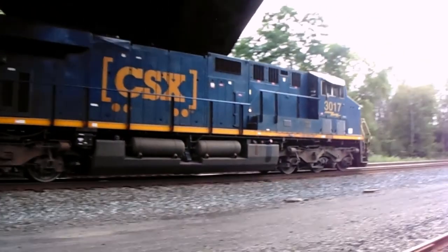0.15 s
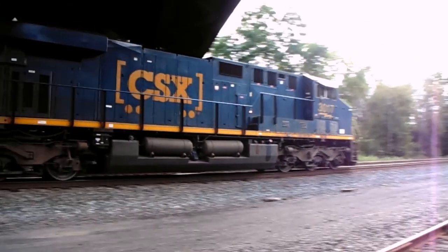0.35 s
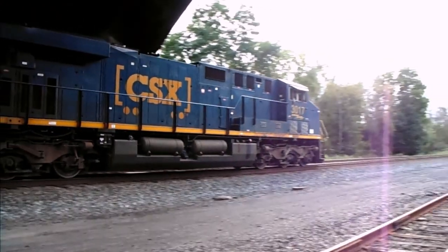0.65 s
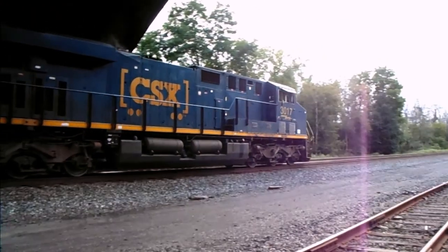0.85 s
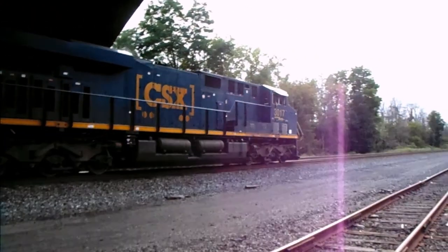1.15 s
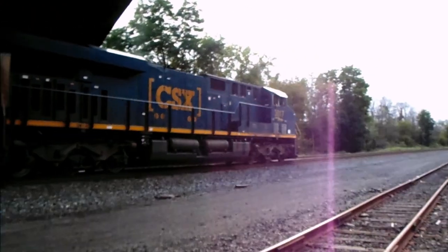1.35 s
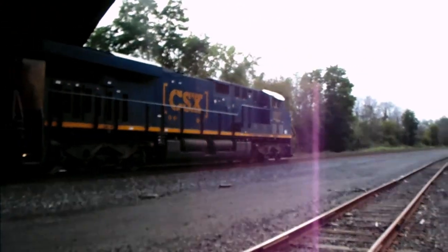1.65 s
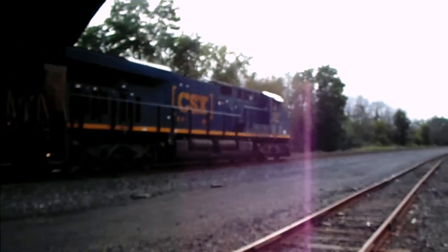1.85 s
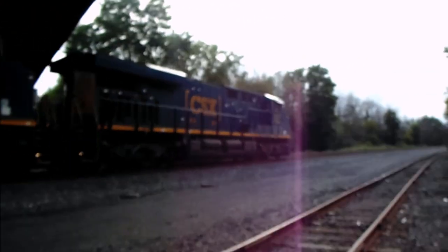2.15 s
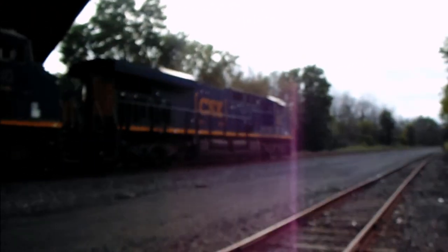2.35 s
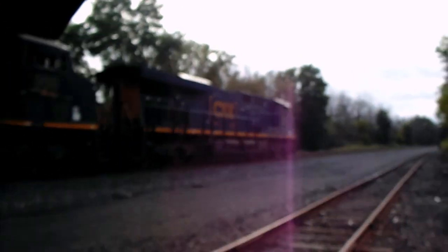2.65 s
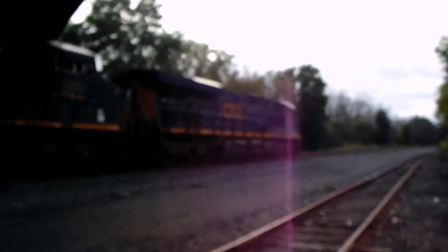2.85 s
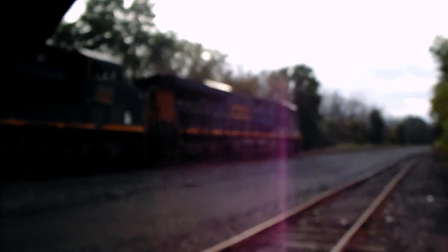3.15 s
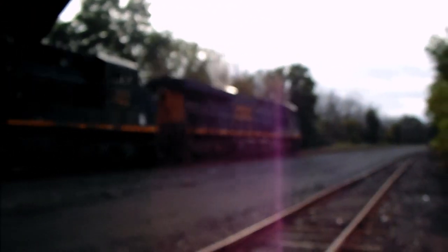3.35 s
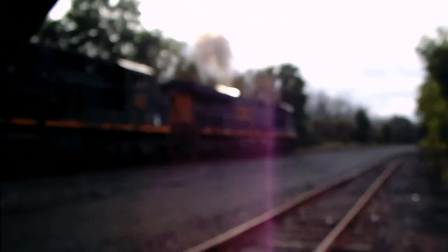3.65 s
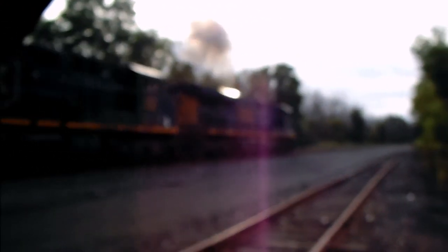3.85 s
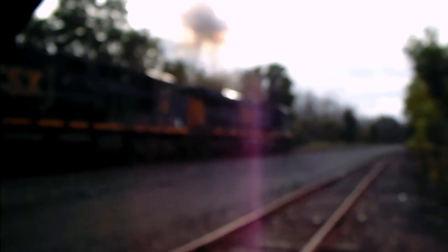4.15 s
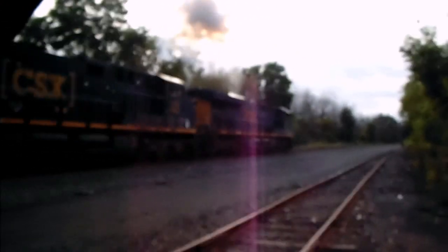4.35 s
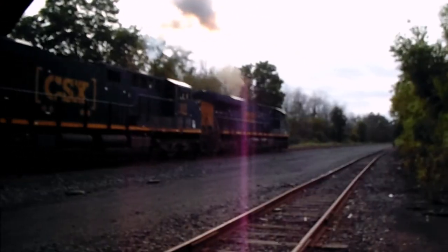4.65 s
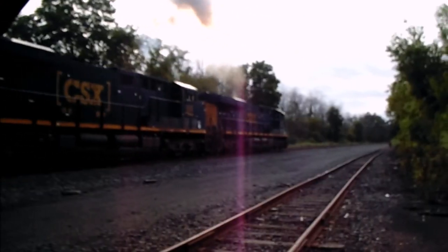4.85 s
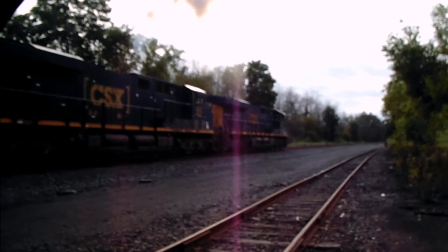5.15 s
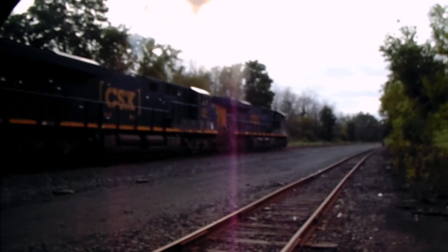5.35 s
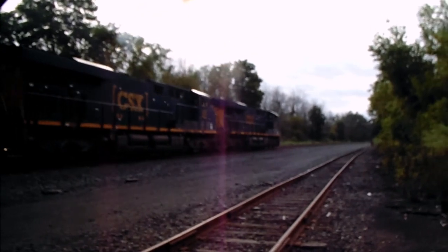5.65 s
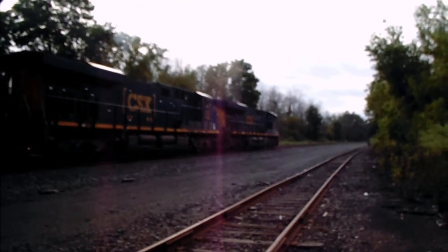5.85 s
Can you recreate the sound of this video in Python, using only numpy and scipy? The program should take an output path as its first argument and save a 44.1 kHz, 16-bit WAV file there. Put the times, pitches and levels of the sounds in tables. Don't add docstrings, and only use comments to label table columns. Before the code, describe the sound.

Two diesel locomotives rumble past close by under power, deep beating drones with a chuffing hiss and roar, then a few sharp wheel knocks on rail joints.

```python
import sys
import numpy as np
from scipy import signal
from scipy.fft import rfft, irfft, next_fast_len
from scipy.io import wavfile
from scipy.ndimage import uniform_filter1d

SR = 44100
rng = np.random.default_rng(int(sys.argv[2]) if len(sys.argv) > 2 else 0)


def boost_factor(decibels):
    exponent = np.asarray(decibels, float) / 20
    return 10 ** exponent


def materialize(psi):
    bounded = np.clip(np.atleast_2d(psi).T, -1, 1)
    quanta = np.round(bounded * 32767).astype(np.int16)
    wavfile.write(sys.argv[1], SR, quanta)


N = 265024
T = np.arange(N) / SR
STEP = 20


def curves(table):
    s, *columns = np.transpose(table)
    return [np.interp(T, s, column) for column in columns]


def humps(rows, t):
    return sum(height * np.exp(-((t - s) / half_s) ** 2) for s, half_s, height in rows)


def walk(rate_hz, step=1):
    hold, count = int(SR / step / rate_hz), -(-N // step)
    levels = np.repeat(rng.standard_normal(count // hold + 1), hold)
    return 1.005 * uniform_filter1d(uniform_filter1d(levels, hold), hold)[:count]


def noise(colour, lo_hz=0, hi_hz=SR):
    hz, db = np.transpose(colour)
    size = next_fast_len(N)
    f = np.maximum(np.arange(size // 2 + 1) * SR / size, 1)
    gain = boost_factor(np.interp(np.log(f), np.log(hz), db, left=-200))
    above_lo = np.clip(np.log2(2 * f / max(lo_hz, 1)), 0, 1)
    above_hi = np.clip(np.log2(2 * f / hi_hz), 0, 1)
    gain = gain * np.sqrt(above_lo - above_hi)
    return irfft(rfft(rng.standard_normal(size)) * gain, size)[:N] * np.sqrt(SR / 2)


def passing(level_s, fades_s, db):
    return db - 10 * np.log10(1 + ((T - level_s) / fades_s) ** 2)


# start_s, fast_cycle_hz, slow_cycle_hz
SPEEDS = [(0.0, 8.749, 6.708), (0.75, 8.703, 6.706), (1.5, 8.667, 6.69), (2.25, 8.64, 6.666),
          (3.0, 8.617, 6.637), (3.75, 8.597, 6.605), (4.5, 8.587, 6.574), (5.25, 8.595, 6.547),
          (6.0, 8.6, 6.526)]


def engine_cycles():
    return [np.cumsum(hz) / SR for hz in curves(SPEEDS)]


# multiple of the four-stroke cycle, level_db
FAST_ORDERS = [(3, -46.8), (4, -44.5), (5, -41.4), (6, -34.8), (7, -38.6), (8, -34.3), (9, -29.6),
               (10, -32.3), (11, -32.6), (12, -21.5), (13, -33.9), (14, -33.9), (15, -24.4), (16, -36.8),
               (17, -41.5), (18, -32.1), (19, -34.6), (20, -37.2), (21, -39.8), (22, -42.9), (23, -42.7),
               (24, -37.8), (25, -44.5), (26, -43.0), (27, -45.8), (28, -47.0), (29, -45.6), (30, -47.3),
               (31, -50.6), (32, -47.9)]
SLOW_ORDERS = [(3, -47.6), (4, -50.5), (5, -45.5), (6, -35.4), (7, -48.5), (8, -44.2), (9, -35.5),
               (10, -44.2), (11, -32.9), (12, -23.9), (13, -30.9), (14, -40.1), (15, -21.2), (16, -31.0),
               (17, -35.7), (18, -36.1), (19, -36.1), (20, -32.8), (21, -35.3), (22, -37.4), (23, -41.3),
               (24, -36.3), (25, -38.8), (26, -35.8), (27, -39.0), (28, -33.9), (29, -41.4), (30, -42.5),
               (31, -37.9), (32, -43.9)]
FAST_ECHOES = {"firing": [(.2, .45, 3), (1.95, 0.25, -15), (2.65, 0.22, -4.5), (3.25, 0.16, -9.5),
               (4.15, .19, -5), (4.65, 0.067, -1), (5.25, .15, -16), (5.75, 0.15, -7)],
               "fifteenth": [(.45, 0.23, 6), (.75, 0.091, -6), (1.3, 0.29, 10.5), (2.02, 0.27, 8.5),
               (3.22, 0.21, -20), (4.42, 0.26, -7), (5.95, 0.1, 12)], "deep": [(.4, 0.18, 4.5),
               (1.65, .15, 4.5), (5.5, 0.49, 3)], "stack": [(.02, 0.1, -19), (.6, 0.16, 6.5),
               (1.6, 0.55, 11), (2.65, 0.35, -5), (3.78, 0.25, -11), (4.5, .2, -4), (5.02, 0.09, 18)]}
SLOW_ECHOES = {"firing": [(.52, .14, 6), (.98, 0.11, -14), (2.6, .21, 7.5), (3.75, 0.2, 4.5),
               (4.25, 0.12, 4.5), (4.52, 0.16, -12), (4.92, 0.13, 10.5), (5.27, .15, -16),
               (5.92, 0.61, -25)], "fifteenth": [(.1, .25, 13), (.55, 0.42, -19), (1.95, 0.5, -9),
               (2.7, 0.32, 5.5), (3.6, 0.46, 7.5), (4.72, .18, -0.5), (5.22, 0.11, -22)],
               "deep": [(3.6, 0.96, -5), (5.5, 0.25, -3)], "stack": [(.02, 0.12, 5), (.52, 0.12, -1),
               (1.25, 0.19, 11.5), (1.75, 0.11, 3), (3.15, 0.2, 2.5), (4.6, 1, 5.5), (5.45, 0.18, 6.5)]}
FAST_LIFT_DB, SLOW_LIFT_DB = (2.5, -1.54, 1.3, -2.1), (-1.1, 0.0053, 0.46, -0.022)
FAST_STACK, SLOW_STACK = (18, 24), (26, 28)
DEEP_BELOW = 9.5
UNEVEN_DB = 0.64


def engine(cycle, orders, near_db, echoes, lift_db, stack, upper_db, fall_db):
    cycle, near_db = cycle[::STEP], near_db[::STEP]
    paths_db = [near_db + lift + humps(rows, T[::STEP]) for rows, lift in zip(echoes.values(), lift_db)]
    firing_db, fifteenth_db, deep_db, stack_db = paths_db
    strong_db = {12: firing_db, 15: fifteenth_db, stack[0]: stack_db, stack[1]: stack_db}
    multiples = np.arange(33, 56)
    upper_levels_db = upper_db - fall_db * (multiples - 33) + 2 * rng.standard_normal(len(multiples))
    out = 0
    for k, db in [*orders, *zip(multiples, upper_levels_db)]:
        start = 2 * np.pi * rng.random()
        fade_db, sway = 4.5 * walk(3, STEP), .35 * walk(4, STEP)
        if k in strong_db:
            path_db = strong_db[k]
        elif k < DEEP_BELOW:
            path_db = deep_db + fade_db
        else:
            path_db = near_db + UNEVEN_DB + fade_db
        out = out + np.sqrt(2) * boost_factor(db + path_db) * np.sin(2 * np.pi * k * cycle + start + sway)
    return signal.resample_poly(out, STEP, 1)[:N]


# pitch_hz, level_db per Hz
GAS_COLOUR = [(20, -80), (40, -76), (70, -68), (100, -68), (140, -60.5), (200, -60), (235, -50),
              (265, -61.5), (400, -110), (500, -160)]


def turbulent_gas(fast_db, slow_db):
    return noise(GAS_COLOUR) * np.sqrt(boost_factor(fast_db) ** 2 + boost_factor(slow_db) ** 2)


# place in the cycle (0-1), level_db, scatter_db
PUFFS = [
    (.85, -.8, 1.2),
    (.52, -4, 2.8),
    (.19, -5, 2.8),
]
# start_s, half_length_s, extra level_db
HARD_CHUFFS = [
    (.44, .03, 3),
    (.91, .03, 1.5),
    (1.13, .03, 4.5),
    (1.24, .03, 1.5),
    (1.82, .03, 5.2),
    (1.94, .03, 2.6),
    (5.3, .03, 3),
    (5.48, .22, 3.2),
]


def leak(cycle, length_s=0.0074, jitter_s=.003):
    places, size_db, scatter_db = np.transpose(PUFFS)[:, :, None]
    turns = np.arange(int(cycle[-1]) + 1) + places
    late, strong = rng.standard_normal((2, *turns.shape))
    times = np.interp(turns, cycle, T, right=9) + jitter_s * late
    sizes_db = size_db + scatter_db * strong
    sizes_db[0] += humps(HARD_CHUFFS, times[0])
    t, power = T[::STEP], 0
    for s, db in zip(times.ravel(), sizes_db.ravel()):
        power = power + boost_factor(db) ** 2 * np.exp(-((t - s) / length_s) ** 2 / 2)
    return np.interp(T, t, power)


# pitch_hz, level_db per Hz
ROAR_COLOUR = [(250, -58), (340, -59), (420, -61.5), (540, -61), (680, -67), (980, -66), (1160, -69),
               (1450, -68.5), (1690, -71.5), (1880, -70.5), (2500, -73), (5500, -75), (8000, -79),
               (14000, -88)]
ROAR_BANDS = [
    (.05, 3, -2, -4.5),
    (0.53, 1, -0.5, -3.5),
    (1, 3.03, -4.5, -3.5),
    (0.61, 2.5, -4.5, -14.5),
]
# pitch_hz, level_db per Hz; and dB lost once screened
FAN_COLOUR, FAN_SCREEN_DB = [(2500, -100), (4000, -75), (6000, -76.5), (7600, -77), (9500, -100), (12000, -160)], -9
# start_s, half_length_s, level_db
TRUCK_SURGES = [
    (1.15, 0.37, 3),
    (3.5, 0.39, 0.3),
    (4.8, 0.095, 0),
]
GRILLE_SURGES = [
    (.6, .22, 1.3),
    (1.45, 0.18, -1.5),
    (1.9, 0.16, 1.3),
    (2.52, .12, 1.5),
    (5.05, 0.2, -1.5),
    (5.95, 0.13, 0.79),
]
SCREENED_S, SCREEN_TAKES_S = 1.96, 0.25
SECOND_S, SECOND_FADES_S = 3.65, 1.65


def puffed(swell):
    return np.sqrt(swell / uniform_filter1d(swell, SR // 4))


def roar(puffs):
    edges_hz = (0, 900, 3200, 9000, 4 * SR)
    puff_shares_db = (-20, -10, -.5, 3)
    flutter_db = .5 * walk(10)
    screened = .5 + .5 * np.tanh((T - SCREENED_S) / SCREEN_TAKES_S)
    grilles = boost_factor(humps(GRILLE_SURGES, T))
    surges = (boost_factor(humps(TRUCK_SURGES, T)), 1, grilles, grilles)
    fans = noise(FAN_COLOUR) * grilles * boost_factor(passing(.8, 1.2, FAN_SCREEN_DB * screened))
    out = fans * puffed(1 + puffs)
    for k, (level_s, fades_s, screen_db, second_db) in enumerate(ROAR_BANDS):
        first = boost_factor(passing(level_s, fades_s, screen_db * screened))
        second = boost_factor(passing(SECOND_S, SECOND_FADES_S, second_db))
        power = first ** 2 + second ** 2
        band = noise(ROAR_COLOUR, edges_hz[k], edges_hz[k + 1]) * np.sqrt(power / np.mean(power))
        swell = puffed(1 + boost_factor(puff_shares_db[k]) ** 2 * puffs)
        out = out + band * swell * boost_factor(flutter_db) * surges[k]
    return out


# pitch_hz, level_db
WHINE = [(274.5, -37), (327, -44), (549, -50), (717, -58), (788, -58), (823, -55), (891, -55), (960, -55),
         (1096, -58), (1507, -57)]


def whine(near_db):
    out = 0
    for hz, db in WHINE:
        fade_db, sway = 2 * walk(4), hz / 300 * walk(7)
        level = np.sqrt(2) * boost_factor(db + 1.16 * near_db + fade_db)
        out = out + level * np.sin(2 * np.pi * hz * T + sway)
    return out


# start_s, half_length_s, pitch_hz, level_db
PANELS = [
    (.7, .8, 552, -40.5),
    (3.7, 0.6, 345, -34),
    (4.76, .11, 292, -28),
    (5.502, .4, 323, -39.5),
    (4.5, .5, 1860, -53),
    (4.6, 0.36, 2690, -50),
]


def panels(width=.05):
    out = 0
    for s, half_s, hz, db in PANELS:
        colour = [(hz * (1 - 3 * width), -40), (hz * (1 - width), 0), (hz * (1 + width), 0),
                  (hz * (1 + 3 * width), -40), (2 * hz, -120)]
        ring = noise(colour)
        out = out + ring / np.std(ring) * humps([(s, half_s, boost_factor(db))], T)
    return out


# start_s, level_db, pitch_hz
JOINTS = [
    (1.822, -28, 1230),
    (4.589, -52, 1306),
    (4.9694, -35, 1350),
    (5.3012, -27, 1386),
    (5.465, -38, 1470),
]


def joints(t60=0.075, rise_s=0.0034):
    out, t = np.zeros(N), T[:SR // 10]
    fall = (1 - np.exp(-t / rise_s)) * np.exp(-np.log(1000) * t / t60)
    for s, db, hz in JOINTS:
        ring = np.sin(2 * np.pi * hz * t) + 0.43 * np.sin(2 * np.pi * .93 * hz * t)
        out[int(s * SR):][:len(t)] += boost_factor(db + 2.0) * fall * ring
    return out


# start_s, half_length_s, level_db
FLANGE = [
    (4.58, .11, .1),
    (4.75, .12, -7),
    (4.95, .08, -1.2),
    (5.34, .14, 2.5),
]
# pitch_hz, level_db per Hz
FLANGE_COLOUR = [(1220, -95), (1300, -78), (1400, -69), (1480, -95), (1600, -160)]
# start_s, pitch_hz, level_db, half_length_s
SQUEAK = (5.985, 7800, -53, .02)


def flange():
    s, hz, db, half_s = SQUEAK
    squeak = humps([(s, half_s, boost_factor(db))], T) * np.sin(2 * np.pi * hz * T + 2 * walk(60))
    rubbing = humps([(at_s, for_s, boost_factor(rub_db)) for at_s, for_s, rub_db in FLANGE], T)
    return noise(FLANGE_COLOUR) * rubbing * boost_factor(2 * walk(36)) + squeak


# start_s, share cancelled (0-1)
GROUND_DIP = [
    (0, 0),
    (3, .15),
    (4.2, .55),
    (5, .6),
    (6.01, .55),
]


def ground(x, dip_hz=250, width_hz=60):
    b, a = signal.iirpeak(dip_hz, dip_hz / width_hz / 2, fs=SR)
    return x - curves(GROUND_DIP)[0] * signal.filtfilt(b, a, x)


def scene():
    fast_cycle, slow_cycle = engine_cycles()
    fast_db = passing(level_s=0.28, fades_s=1.45, db=2.65)
    slow_db = passing(level_s=3.9, fades_s=2.53, db=0.2)
    fast = engine(fast_cycle, FAST_ORDERS, fast_db, FAST_ECHOES, FAST_LIFT_DB, FAST_STACK, upper_db=-50, fall_db=.5)
    slow = engine(slow_cycle, SLOW_ORDERS, slow_db, SLOW_ECHOES, SLOW_LIFT_DB, SLOW_STACK, upper_db=-53, fall_db=-.05)
    engines = boost_factor(0.62) * (fast + slow) + whine(fast_db)
    air = turbulent_gas(fast_db, slow_db) + roar(leak(fast_cycle))
    metal = panels() + joints() + flange()
    return ground(engines + air + metal)[None]


def top_cut(x):
    return signal.sosfilt(signal.butter(12, 14120, fs=SR, output="sos"), x)


def record(dry):
    mix = np.tanh(0.75 * dry) / 0.67
    return top_cut(mix)


dry = scene()
out = record(dry)
materialize(out)
```